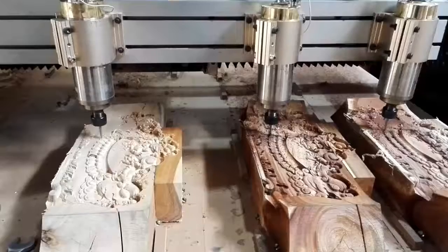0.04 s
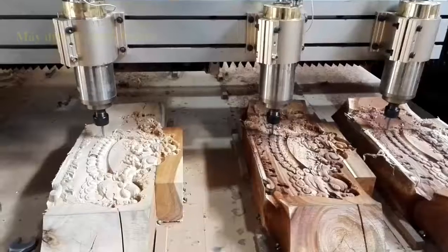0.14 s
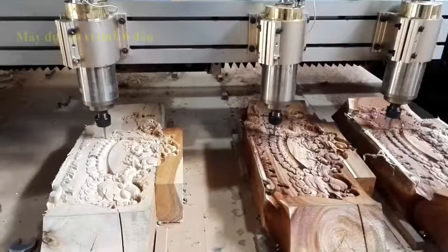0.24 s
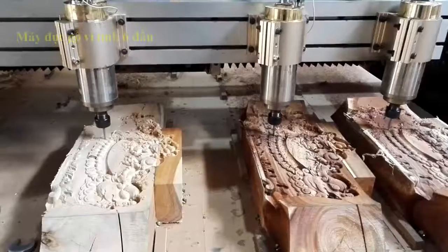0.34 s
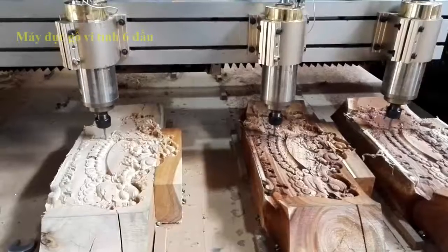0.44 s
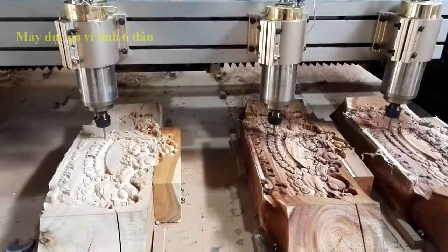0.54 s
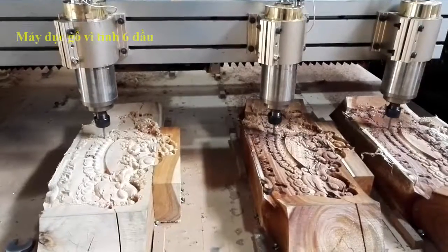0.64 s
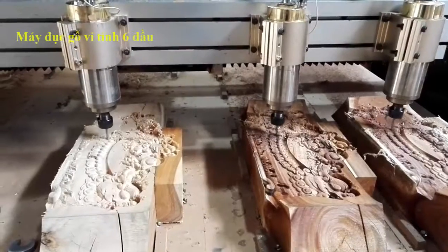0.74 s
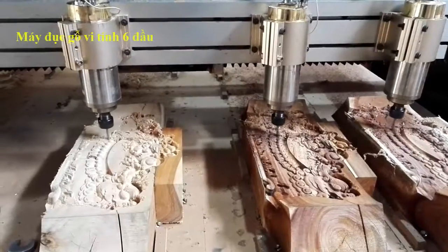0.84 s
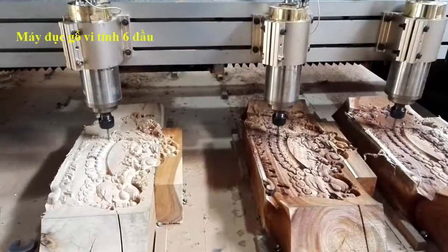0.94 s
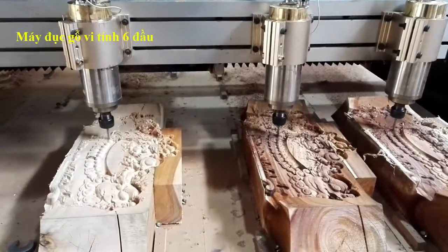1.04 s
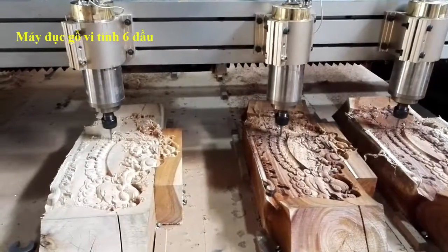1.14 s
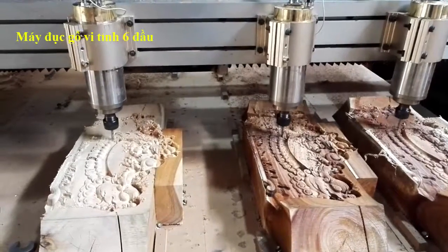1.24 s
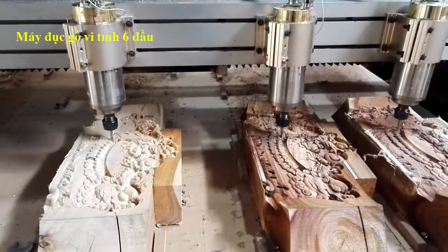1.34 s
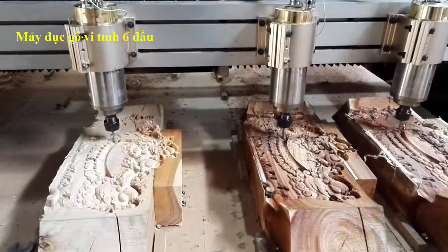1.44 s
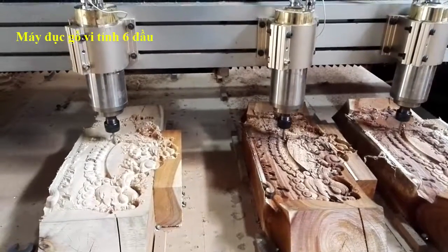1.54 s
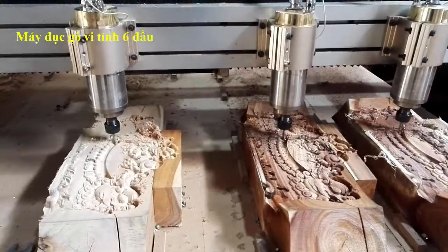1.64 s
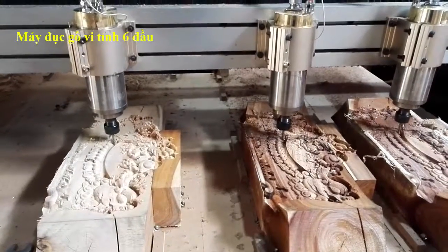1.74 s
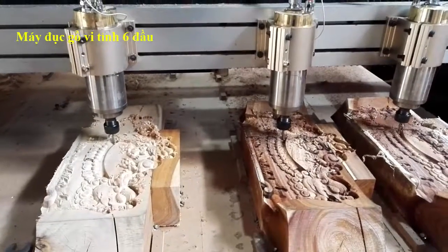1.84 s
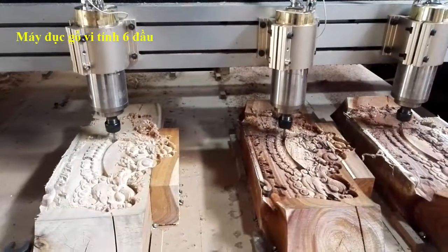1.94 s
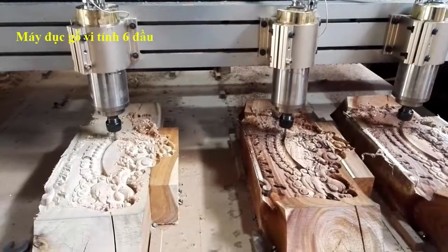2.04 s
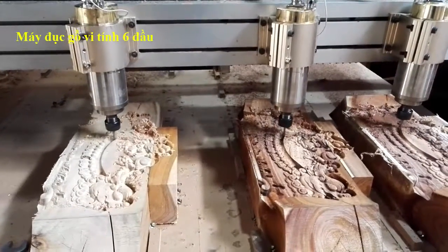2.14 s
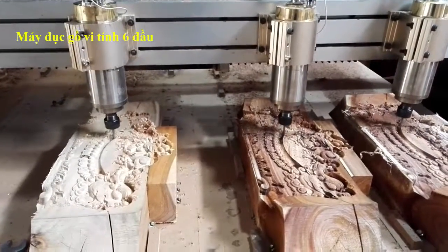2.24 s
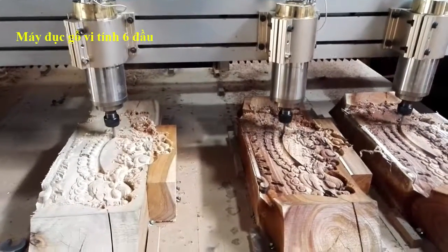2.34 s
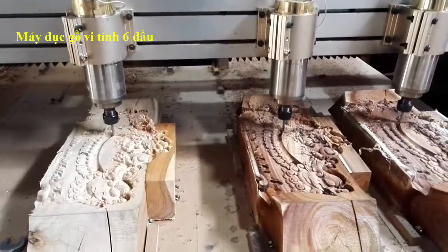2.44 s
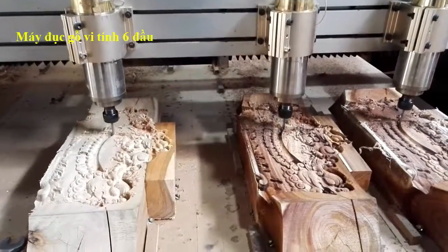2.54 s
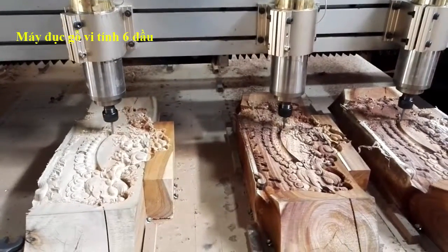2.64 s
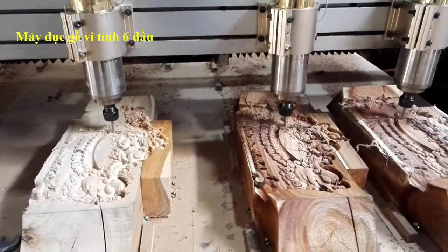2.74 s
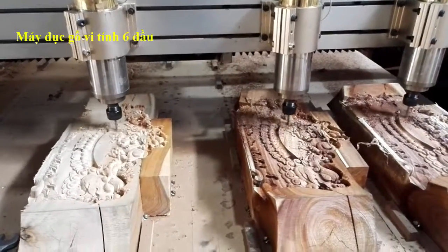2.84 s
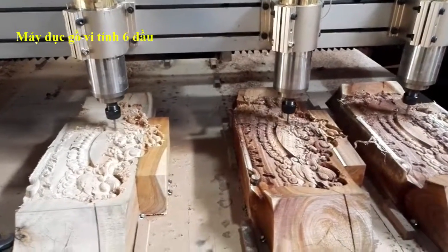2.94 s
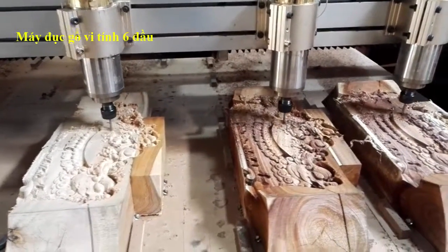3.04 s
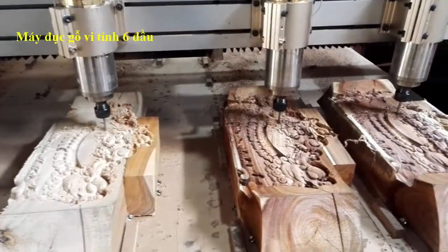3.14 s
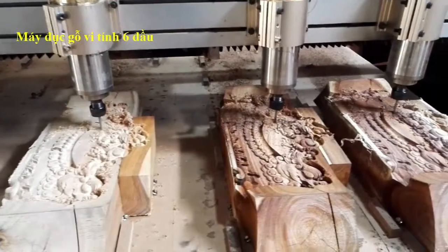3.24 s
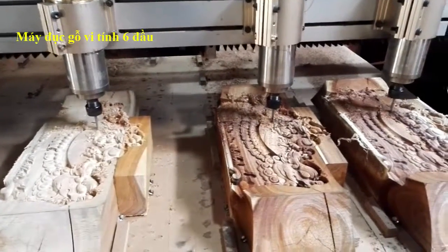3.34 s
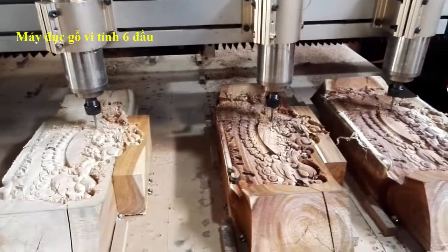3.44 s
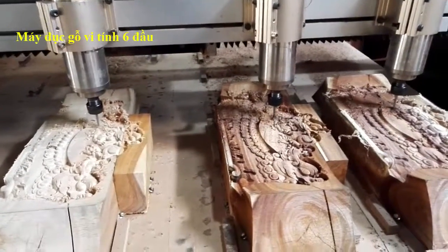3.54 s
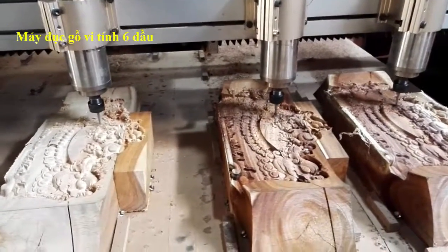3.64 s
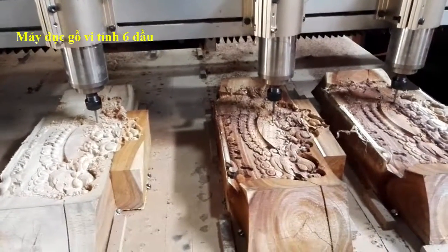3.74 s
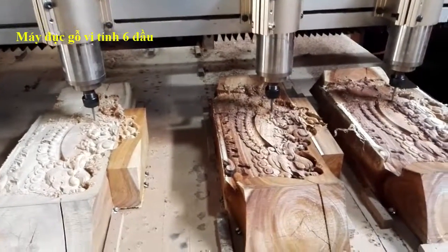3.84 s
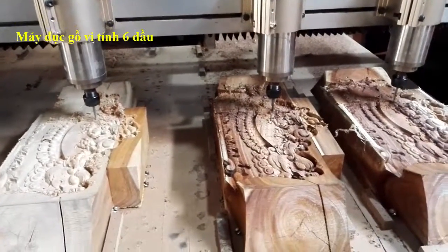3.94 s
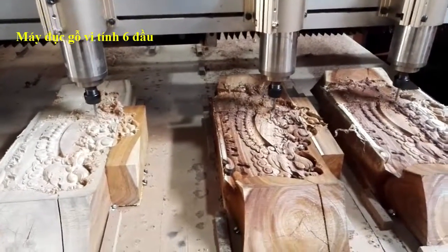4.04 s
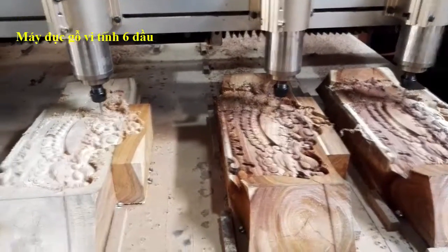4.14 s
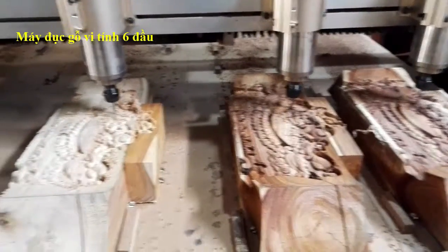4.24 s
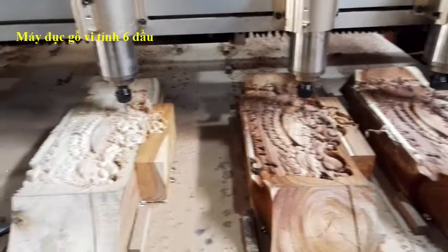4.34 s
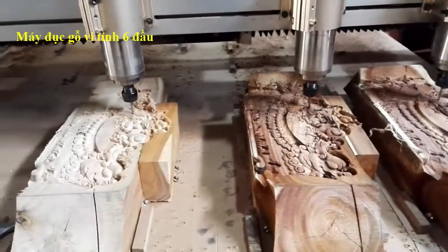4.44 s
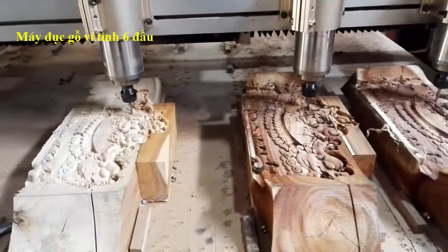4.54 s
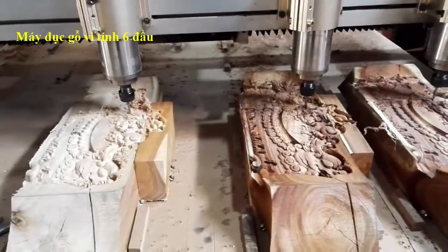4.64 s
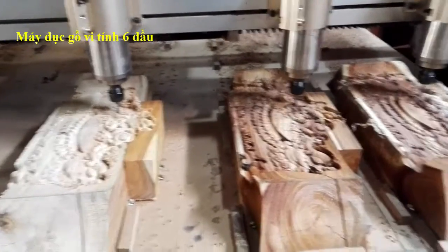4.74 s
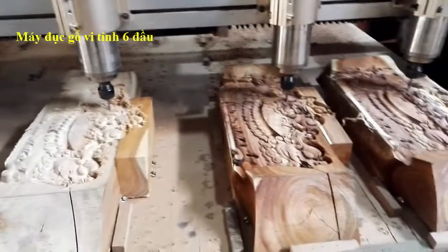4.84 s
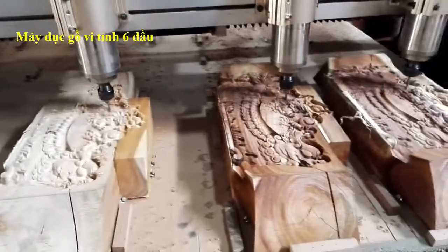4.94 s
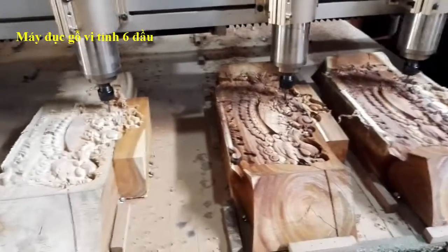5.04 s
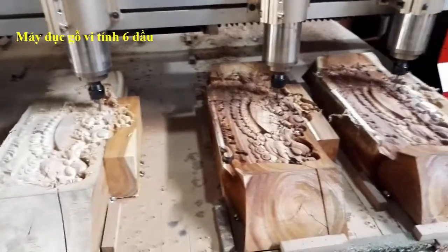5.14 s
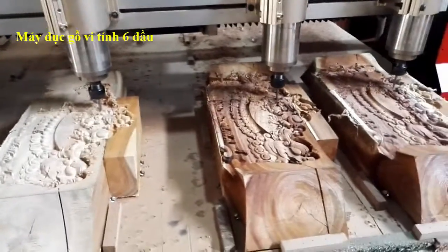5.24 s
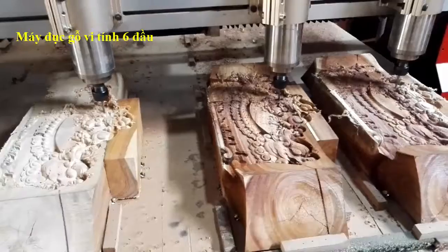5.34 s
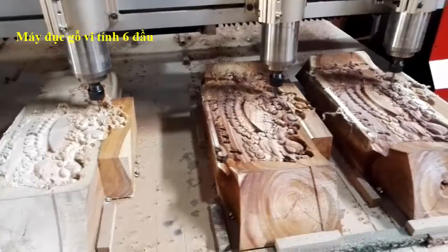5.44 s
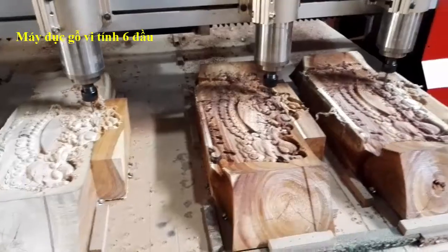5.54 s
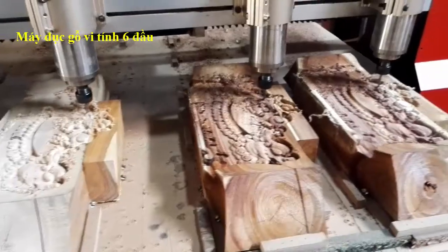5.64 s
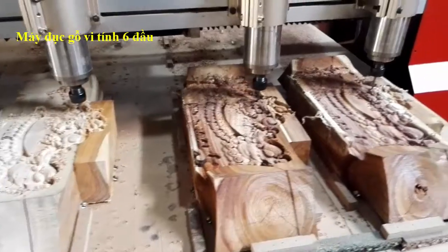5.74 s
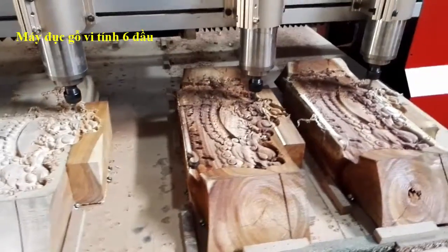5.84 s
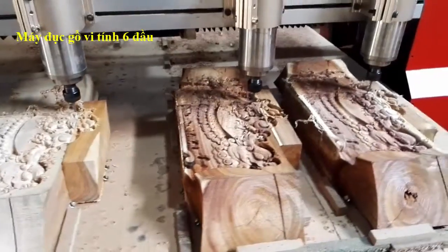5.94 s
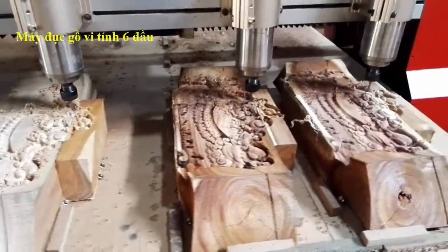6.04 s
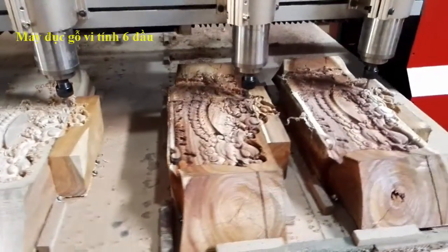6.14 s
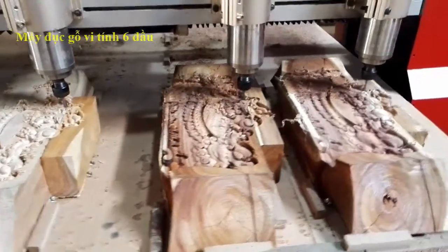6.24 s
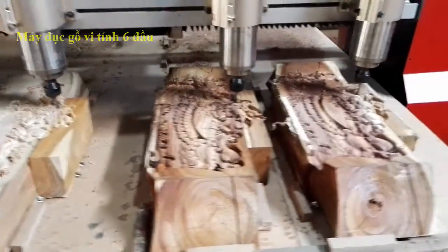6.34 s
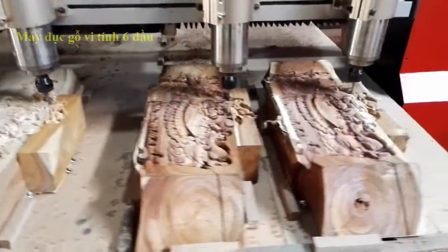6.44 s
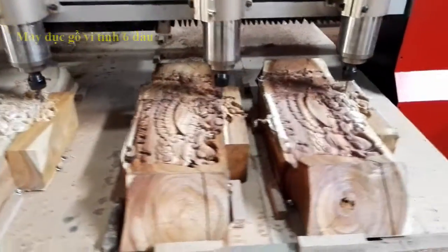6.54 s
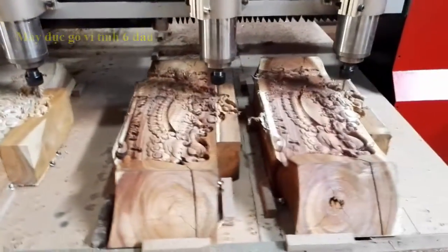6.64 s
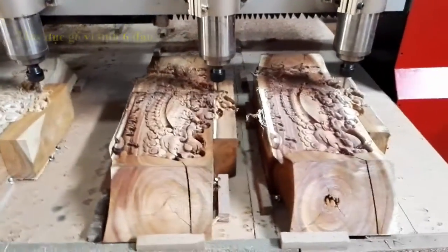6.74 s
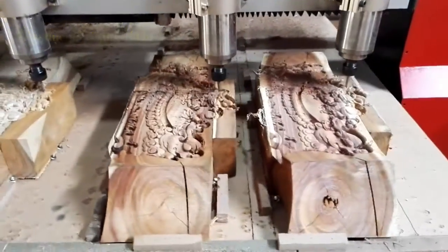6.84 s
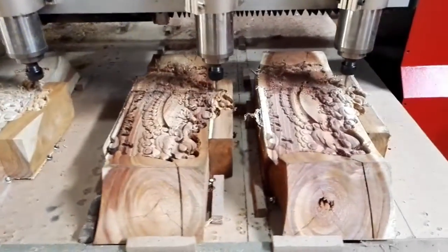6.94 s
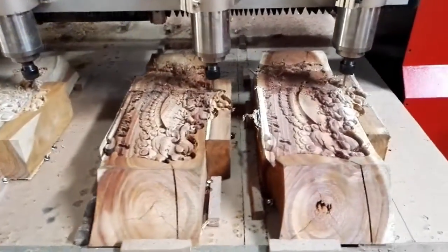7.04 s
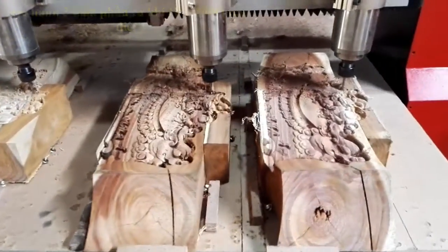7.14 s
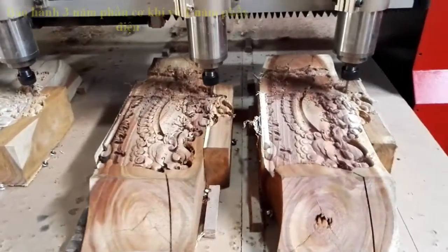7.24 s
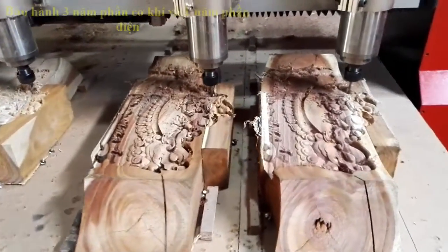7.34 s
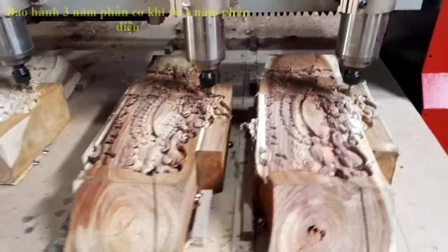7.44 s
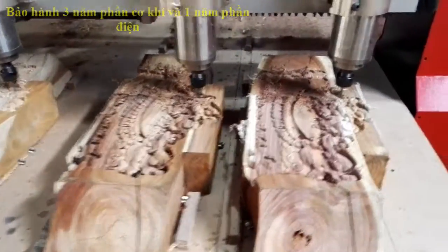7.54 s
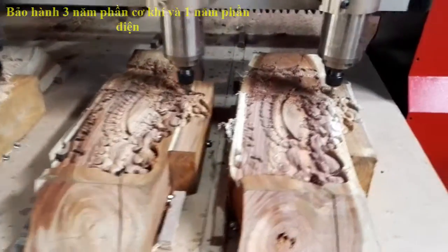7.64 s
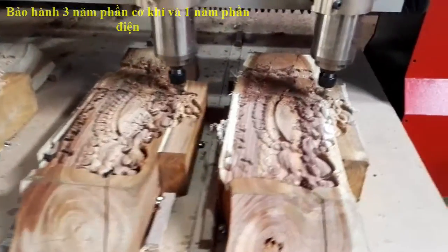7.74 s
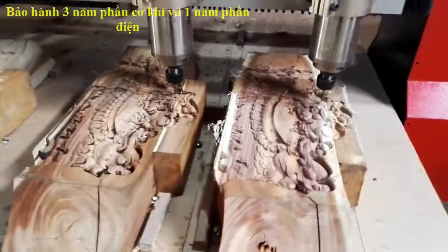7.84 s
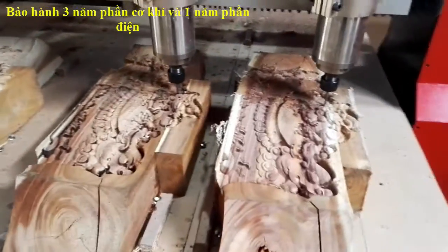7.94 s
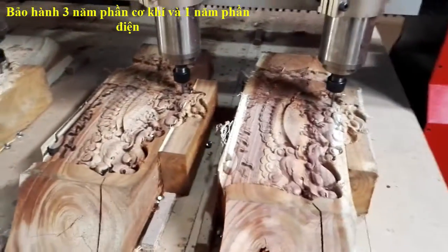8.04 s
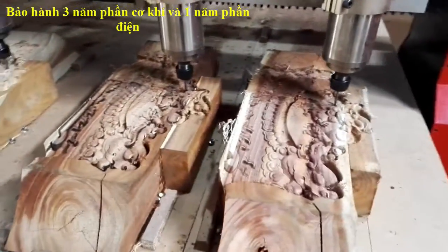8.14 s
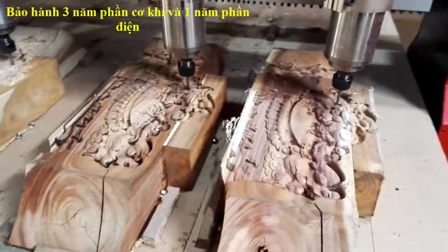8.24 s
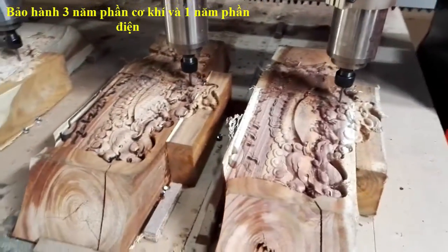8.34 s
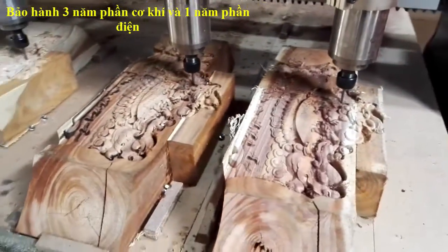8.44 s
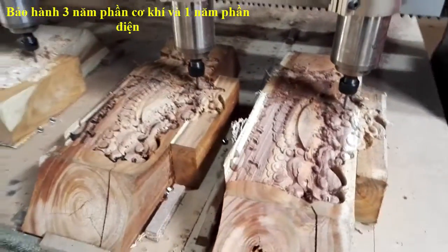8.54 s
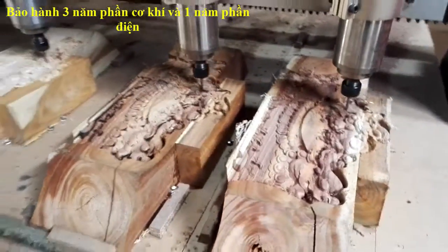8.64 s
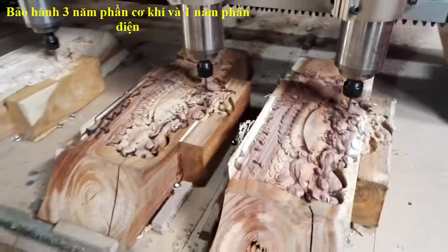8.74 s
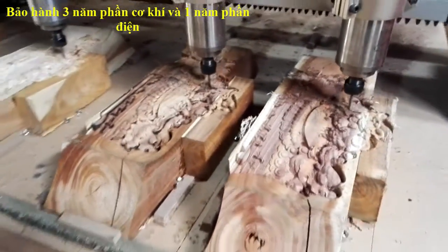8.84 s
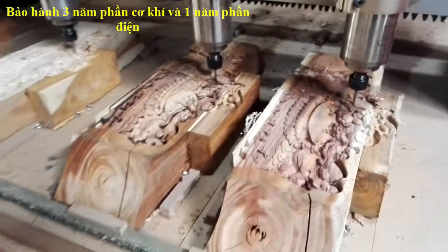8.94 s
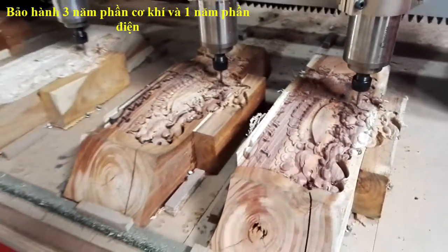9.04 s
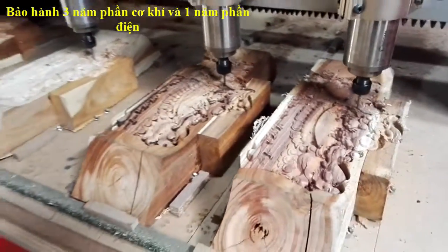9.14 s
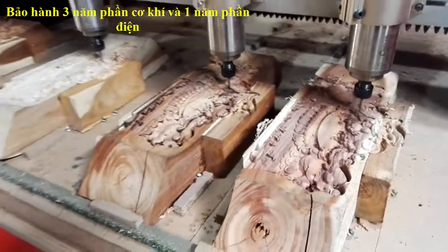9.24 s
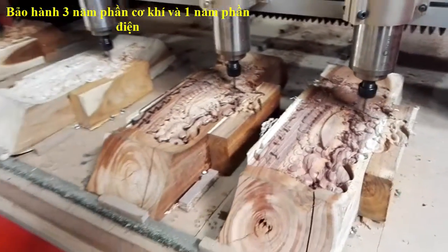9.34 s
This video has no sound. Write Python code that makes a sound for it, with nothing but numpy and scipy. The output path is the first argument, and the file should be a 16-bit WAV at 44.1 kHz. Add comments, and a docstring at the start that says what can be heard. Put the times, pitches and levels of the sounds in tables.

```python
"""A steady whine fades in: a row of router spindles is carving hardwood in a workshop.
Each turn repeats the cut, so the whine is a stack of harmonics (multiples of the turning rate) that
swell and fade as the spindles, at nearly the same speed, slip against each other. Behind it chips
hiss, the drive whistles, and pumps and the frame rumble. The level jumps briefly near 2.5 s.
Later the sound cuts forward once with a soft click, like a brief dropout."""
import sys
import numpy as np
from scipy import signal
from scipy.io import wavfile
from scipy.ndimage import uniform_filter1d

SR = 44100
rng = np.random.default_rng(int(sys.argv[2]) if len(sys.argv) > 2 else 0)


def bounce(signal):
    """Save signal as a 16-bit WAV file at the path given by the first command-line argument."""
    frames = np.transpose(np.atleast_2d(signal))
    limited = np.clip(frames, -1, 1)
    pcm = np.round(limited * 32767).astype(np.int16)
    wavfile.write(sys.argv[1], SR, pcm)


N = 413658
TIME = np.arange(N) / SR
STEP = 64   # samples between the points of a slow random curve
OPPOSITE = np.array([[1], [-1]])   # adds on the left, subtracts on the right
SHAFT_HZ = 399.46   # spindle turns per second
DROPOUT_S, DROPOUT_RAD = 5.3602, 1.7   # when the sound cuts forward, and by what phase


def from_db(db):
    """Turn decibels into a gain."""
    return 10 ** (np.asarray(db) / 20)


def rms_one(x):
    """Scale a signal to an average power of 1."""
    return x / np.sqrt(np.mean(np.abs(x) ** 2) + 1e-20)


def in_time(rows):
    """Join (time, value) rows into one value per sample."""
    return np.interp(TIME, *np.transpose(rows))


def at_hz(rows, hz):
    """Read (frequency, value) rows at one frequency, with octaves evenly spaced."""
    frequencies, values = np.transpose(rows)
    return np.interp(np.log(hz), np.log(frequencies), values)


def drift(rate_hz):
    """A smooth random curve of typical size 1; a higher rate moves faster."""
    pole = np.exp(-2 * np.pi * rate_hz * STEP / SR)
    noise = rng.standard_normal(N // STEP + 2002)
    points = rms_one(signal.lfilter([1], [1, -2 * pole, pole * pole], noise)[2000:])
    return np.interp(np.arange(N) / STEP, np.arange(len(points)), points)


def beating(rate_hz):
    """Many near-equal tones together: strength and phase drift at random (a complex curve)."""
    return (drift(rate_hz) + 1j * drift(rate_hz)) / np.sqrt(2)


# How alike the noise is on the left and right: (frequency [Hz], likeness [0 to 1])
STEREO_LIKENESS = [(60, .96), (150, .94), (300, .85), (640, .55), (1400, .3), (4000, .35), (14900, .35)]
def banded_noise(spectrum, low_hz, count, flicker_db, balance=((1, 0), (2, 0))):
    """Stereo noise of power 1, built from flickering bands a third of an octave wide."""
    out, shared_flicker = 0, drift(9.5)
    edges = low_hz * 2 ** (np.arange(count + 1) / 3)
    white = rng.standard_normal((2, 2, N))
    for k, (low, high) in enumerate(zip(edges, edges[1:])):
        band = signal.butter(2, [low, high], "band", fs=SR, output="sos")
        middle, side = signal.sosfilt(band, white[k % 2])
        hz = np.sqrt(low * high)
        alike = at_hz(STEREO_LIKENESS, hz)
        stereo = np.sqrt(1 + alike) * middle + np.sqrt(1 - alike) * side * OPPOSITE
        flicker = 1.87 * shared_flicker + drift(5.1)
        gain = from_db(at_hz(spectrum, hz) + flicker_db * flicker)
        pan = from_db(at_hz(balance, hz) / 2 * OPPOSITE)
        out = out + gain * pan * stereo
    return rms_one(out)


# Tone colour of the rumble: (frequency [Hz], relative level [dB])
RUMBLE_SPECTRUM = [(25, -14), (50, 1.5), (85, 7.5), (120, 8), (170, 2.5), (220, -26), (280, 17.5),
                   (330, -4.5), (420, 13), (520, -11.5), (700, 14), (900, -2), (1200, 7), (1800, -41)]
def rumble():
    """The pumps and the shaking frame make a low noise."""
    return from_db(-36) * banded_noise(RUMBLE_SPECTRUM, low_hz=22.7, count=19, flicker_db=.8)


# Faint steady tones of pumps and drives: (frequency [Hz], relative level [dB])
DRIVE_TONES = [(113, -56), (269.2, -54), (279, -57), (578, -58), (2472, -59), (4597, -61), (5399, -53),
               (8699, -57), (10191, -56), (10648, -58), (11391, -57)]
# A thin, high whistle: (time [s], relative level [dB])
THIN_WHISTLE = [(.1, -48), (.4, -42), (.55, -60), (.75, -39), (1.15, -56), (1.4, -40), (1.6, -43),
                (1.8, -48), (2.05, -45), (2.45, -48), (2.9, -70), (3.4, -51), (4.15, -39), (4.3, -40),
                (4.7, -41), (6.2, -44), (6.6, -37), (7.6, -38), (7.9, -38), (8.5, -36), (8.7, -39),
                (9.38, -50)]
# A breathy whistle that grows and chatters near the end: (time [s], relative level [dB])
BREATHY_WHISTLE = [(7.9, -50), (7.96, -55), (8.104, -43), (8.202, -48), (8.226, -37), (8.286, -52),
                   (8.408, -41), (8.432, -49), (8.642, -39), (8.682, -40), (8.756, -34), (8.788, -43),
                   (8.962, -37), (8.974, -45), (9.212, -37), (9.232, -49), (9.336, -40), (9.35, -40)]
def drive():
    """Pumps and drives hum and whistle in wavering tones, louder on the left."""
    out = np.zeros((2, N))
    tones = [(hz, db, 5, .9) for hz, db in DRIVE_TONES]
    tones += [(12592, in_time(THIN_WHISTLE), 5, .4), (11240, in_time(BREATHY_WHISTLE), 60, 2)]
    for hz, db, waver_hz, waver in tones:
        tone = from_db(db) * np.exp(2j * np.pi * hz * TIME) * (1 + waver * beating(waver_hz))
        out[0] += 1.8 * np.real(tone)
        out[1] += 1.1 * np.real(tone * np.exp(1j * hz / 2900))   # high tones arrive out of step
    return out


# Tone colour of the hiss: (frequency [Hz], relative level [dB])
CHIP_SPECTRUM = [(900, -4.5), (1300, -4.5), (2000, -1), (3300, -6), (5000, -4), (7000, -2), (8300, -3.5),
                 (10500, 5), (12500, -5.5), (15000, -1.5)]
# Which side the hiss leans to: (frequency [Hz], left minus right [dB])
CHIP_BALANCE = [(60, 0.0), (150, 0.0), (380, 0.5), (950, 3), (2370, 1.5), (5950, -2.5), (14900, 2)]
def chips(angle, hiss_db):
    """Torn fibres and air from the cutting edges hiss, pulsing once a turn."""
    pulse = 1 + .1 * np.cos(angle)
    hiss = banded_noise(CHIP_SPECTRUM, low_hz=797.5, count=13, flicker_db=.6, balance=CHIP_BALANCE)
    # The tearing repeats on the next three turns, duller and half as strong each time.
    dull = signal.sosfilt(signal.butter(2, 7000, fs=SR, output="sos"), hiss)
    repeats = sum(.5 ** turn * np.roll(dull, round(turn * SR / SHAFT_HZ), axis=1) for turn in (1, 2, 3))
    left, right = from_db(hiss_db) * pulse * (hiss + repeats)
    # From about 2 s, the hiss reaches the right side slightly later than the left.
    lag_samples = np.round(np.interp(TIME, (1.5, 2.2), (0, 16))).astype(int)
    return np.array([left, right[np.arange(N) - lag_samples]])


def dropout_click():
    """A soft, dull click where the sound cuts forward, like a brief dropout."""
    peak_db, dullness_hz = -17, 1800
    decay = 2 * np.pi * dullness_hz * np.maximum(TIME - DROPOUT_S, 0)
    return from_db(peak_db) * np.e * decay * np.exp(-decay)


RISE_S, FALL_S = .023, .019   # how fast a deep cut or a ringing harmonic comes and goes
# Deeper cuts: (start [s], end [s], bite change [dB], squeal change [dB], hiss change [dB])
DEEP_CUTS = [(0.47, 0.612, 1, 1, 0), (1.214, 1.477, 2, 3, -0.5), (1.528, 1.8, 2.5, 3, 1),
             (1.77, 1.889, 3.5, 3, 3.5), (1.892, 1.955, -2, 17, 4.5), (2.038, 2.12, 5, 6, 5),
             (2.12, 2.438, 1.5, 3.5, 1), (2.816, 3.05, 6, 8, 3), (3.118, 3.205, 5, 3, -1),
             (3.537, 3.718, 3.5, 11, 1), (3.737, 3.81, 2.5, 7, -0.5), (4.012, 4.1, -0.5, 6, 2),
             (4.292, 4.413, 0, 9.5, 1), (4.43, 4.54, 4.5, 12, 3.5), (4.72, 4.797, 6.5, 10, 1.5),
             (4.824, 4.945, 5, 9, 3.5), (5.046, 5.125, 5.5, 6, -1), (5.263, 5.436, 5, 3, 0.5),
             (5.586, 5.73, 4.5, 0, 1), (6.086, 6.21, 3, 6, 2.5), (6.606, 6.768, 6, 6.5, 0),
             (6.77, 6.877, 5, 4, 3.5), (7.624, 7.8, 2, 1, 2), (8.306, 8.702, 1, 2, 1.5),
             (8.71, 8.77, 3, 11, 2), (8.987, 9.24, 3, 5, 2)]
def cut_levels():
    """Levels in dB of the bite, squeal and hiss, which follow how deep the cutters dig."""
    starts, ends, *columns = np.transpose(DEEP_CUTS)
    wander_db = .6 * drift(7.4)
    levels = []
    for usual_db, changes in zip((-40, -47, -31.5), columns):
        extra_db = np.zeros(N)
        for start, end, db in zip(starts, ends, changes):
            extra_db += db * (TIME > start) * np.exp(-np.maximum(TIME - end, 0) / FALL_S)
        levels.append(usual_db + uniform_filter1d(extra_db, size=int(RISE_S * SR)) + wander_db)
    return levels


# The bite, harmonics 7 to 21: (harmonic [number], level against the bite level [dB])
BITE_HARMONICS = [(7, -6.5), (8, -8.5), (9, -6), (10, -4), (11, -5), (12, -5), (13, -6), (14, -6.5),
                  (15, -9), (16, -4.5), (17, -6.5), (18, -6.5), (19, -10.5), (20, -35), (21, -39)]
# The squeal, harmonics 22 to 35: (frequency [Hz], level against the squeal level [dB])
SQUEAL_SPECTRUM = [(8500, -12), (9200, -1.5), (10400, 0), (11600, -10), (12800, -7), (14200, -12)]
def high_whine(angle, bite_db, squeal_db):
    """Weak harmonics come and go on each side as the spindles slip; uneven wood roughens them."""
    out = np.zeros((2, N))
    levels = [(harmonic, bite_db + db) for harmonic, db in BITE_HARMONICS]
    for harmonic in range(22, 36):
        levels.append((harmonic, squeal_db + at_hz(SQUEAL_SPECTRUM, harmonic * SHAFT_HZ)))
    for harmonic, db in levels:
        shared_fade = beating(3.9)
        swell_db = .98 * drift(3.2)
        tone = from_db(db + swell_db) * np.exp(1j * harmonic * angle)
        for channel in range(2):
            own_fade, roughness = beating(7.4), beating(35.4)
            out[channel] += np.real(tone * (.22 * shared_fade + own_fade + .78 * roughness))
    return out


# Harmonics that ring out; a row that ends before it starts is faint or silent:
# (harmonic [number], start [s], end [s], relative level [dB])
RINGING_HARMONICS = [(7, 0.44, 0.58, -45), (13, 0.48, 0.69, -46), (7, 1.77, 2.04, -43), (13, 1.8, 1.9, -46),
                     (16, 1.7, 1.7, -45), (15, 2.2, 2.2, -46), (13, 2.05, 2, -38), (12, 2.05, 2.33, -46),
                     (10, 2.05, 2.15, -52), (7, 2.2, 2, -43), (11, 2.2, 2.3, -43), (9, 2.6, 2.9, -44),
                     (11, 2.9, 3.27, -40), (13, 2.8, 3.1, -38.5), (15, 2.85, 3.03, -41),
                     (10, 3.1, 3.2, -44), (12, 3.2, 3.0, -44), (11, 2.9, 3.5, -53), (11, 2.9, 4.1, -50),
                     (7, 4.05, 4.4, -42), (9, 4.6, 4.7, -42), (16, 4.4, 4.2, -49), (13, 4.5, 4.6, -47),
                     (7, 5.4, 5.5, -38), (11, 5.1, 5.7, -45), (13, 6.1, 5.8, -44), (13, 6.1, 6.26, -38.5),
                     (12, 6.1, 6.18, -38.5), (11, 6.1, 6.4, -48), (9, 7.2, 6.78, -42), (11, 6.9, 6.85, -43),
                     (12, 6.62, 6.78, -48), (10, 6.72, 6.82, -38.5), (14, 6.7, 6.95, -41),
                     (15, 7.6, 6.9, -51), (9, 7.5, 6.7, -40), (7, 7.2, 7.5, -41.5), (16, 8.0, 8.302, -44)]
def ringing(angle):
    """Single high harmonics ring out clearly while a cutter bites."""
    out = np.zeros((2, N))
    for harmonic, start, end, db in RINGING_HARMONICS:
        span = slice(int((start - .05) * SR), int((end + .2) * SR))
        rise = np.clip((TIME[span] - start) / RISE_S + .5, 0, 1)
        fall = np.exp(-np.maximum(TIME[span] - end, 0) / FALL_S)
        roughness = np.abs(1 + .35 * beating(30)[span])
        phases = rng.uniform(0, 2 * np.pi) + rng.uniform(-1.15, 1) * OPPOSITE
        tone = np.cos(harmonic * angle[span] + phases)
        out[:, span] += 2 * from_db(db) * rise * fall * roughness * tone
    return out


# Harmonics 3 to 6 of the whine, one table each: (time [s], level [dB])
THIRD_LEVEL = [(0.2, -31), (0.43, -40), (0.5, -33), (0.96, -31.5), (1.04, -48), (1.17, -31.5), (1.75, -32),
               (1.85, -24.5), (2.03, -44), (2.08, -30), (2.24, -45), (2.44, -46), (2.49, -35), (2.64, -41),
               (2.77, -34.5), (3.0, -32), (3.1, -43), (3.15, -34), (3.28, -32), (3.33, -43.5),
               (3.61, -32.5), (3.87, -53), (4.33, -32.5), (4.58, -45), (4.63, -38), (4.91, -35.5),
               (5.27, -44), (5.32, -33), (5.47, -37), (5.65, -33), (5.83, -52), (5.98, -31), (6.14, -43.5),
               (6.37, -42), (6.42, -30), (6.57, -58), (6.62, -37), (6.8, -30), (6.98, -39.5), (7.18, -35.5),
               (7.26, -50), (7.31, -34), (7.41, -34), (7.51, -48), (7.56, -34.5), (7.87, -33), (7.94, -48),
               (8.25, -36.5), (8.46, -42), (8.76, -31.5), (9.32, -41), (9.35, -40)]
FOURTH_LEVEL = [(0.2, -40), (0.3, -35.5), (0.43, -42), (0.5, -32), (0.61, -44), (0.66, -40.5), (1.35, -35),
                (1.47, -39), (1.52, -62), (1.58, -39), (1.65, -36), (1.78, -46), (1.83, -36), (2.14, -31.5),
                (2.21, -47), (2.49, -35), (2.57, -48), (2.95, -28.5), (3.03, -37), (3.2, -37), (3.28, -51),
                (3.38, -36), (3.51, -52), (3.56, -39), (3.67, -59), (3.72, -46.5), (4.58, -40.5),
                (4.91, -49), (4.99, -33), (5.07, -49), (5.55, -38.5), (5.73, -47), (5.96, -40), (6.01, -61),
                (6.06, -39), (6.16, -34), (6.34, -47), (7.11, -37.5), (7.33, -52), (7.51, -35), (7.85, -52),
                (7.92, -39.5), (8.35, -45), (8.41, -38), (8.51, -48), (8.74, -35), (8.86, -49), (9.35, -43)]
FIFTH_LEVEL = [(0.2, -44), (0.35, -39), (0.4, -51), (0.5, -32), (0.56, -52), (0.79, -38.5), (0.86, -47),
               (0.89, -34), (1.06, -45), (1.22, -39), (1.32, -52), (1.42, -42), (1.5, -46), (1.75, -39),
               (1.78, -47), (1.96, -51), (2.11, -37), (2.26, -52), (2.49, -40), (2.54, -53), (2.88, -35),
               (3.64, -55), (3.76, -42.5), (4.79, -50), (4.94, -39), (5.04, -50), (5.14, -44), (6.06, -51),
               (6.11, -38), (6.54, -46.5), (6.57, -35), (6.75, -31), (6.82, -44), (6.98, -33), (7.23, -51),
               (7.46, -35.5), (7.67, -45), (8.23, -38), (8.33, -48), (8.41, -41), (8.56, -50), (8.66, -35),
               (8.76, -38), (9.35, -40)]
SIXTH_LEVEL = [(0.2, -40), (0.32, -39), (0.35, -43), (0.86, -50), (0.89, -40), (0.99, -40), (1.01, -45),
               (1.29, -44), (1.35, -32), (1.45, -43), (1.52, -38), (1.7, -52), (1.78, -30), (2.01, -52),
               (2.08, -30.5), (2.44, -35), (2.49, -38), (2.54, -38), (2.64, -45), (2.85, -22), (2.9, -30),
               (3.05, -27), (3.15, -46), (3.44, -44.5), (3.69, -35.5), (3.74, -49), (4.0, -51),
               (4.05, -34.5), (4.23, -57), (4.35, -40), (4.41, -49), (4.53, -36), (4.63, -49), (4.81, -39),
               (4.84, -32.5), (5.14, -33), (5.19, -56), (5.29, -35.5), (5.4, -40), (5.68, -36.5),
               (5.88, -43), (5.93, -34.5), (6.09, -42.5), (6.14, -34), (6.39, -54), (6.75, -28.5),
               (7.0, -35), (7.11, -32.5), (7.23, -46.5), (7.46, -30), (7.51, -42), (7.85, -43.5),
               (7.94, -30.5), (8.1, -37), (8.76, -30), (8.84, -33.5), (8.91, -54), (8.97, -34), (9.04, -50),
               (9.35, -51)]
def middle_levels():
    """Levels in dB of harmonics 3 to 6, with small random fades added."""
    levels, depth = [], .15
    for rows in (THIRD_LEVEL, FOURTH_LEVEL, FIFTH_LEVEL, SIXTH_LEVEL):
        fade = np.abs(1 + depth * beating(3.5)) / np.hypot(1, depth) + .042
        levels.append(in_time(rows) + 20 * np.log10(fade))
    return levels


# Two sets of cutting edges slip out of step and back:
# (out of step [s], in step [s], level in step [dB], weaker set [share of the stronger])
EDGE_SLIPS = [(0.0, 0.187, -23, .3), (0.334, 0.485, -25.5, 0.48), (0.587, 0.733, -24, 0.43),
              (0.877, 1.135, -23.5, 0.44), (1.302, 1.59, -24, 0.33), (1.772, 1.824, -28, 0.38),
              (1.9, 2.02, -29, 0.26), (2.077, 2.118, -18, 0.44), (2.185, 2.308, -24.5, 0.99),
              (2.36, 2.47, -21.5, 0.061), (2.6, 2.652, -22.5, 0.14), (2.815, 2.86, -17.5, 0.43),
              (2.9, 2.96, -17, .1), (3.134, 3.294, -22.5, 0.81), (3.515, 3.595, -21, 1),
              (3.826, 4.02, -29.5, 1), (4.145, 4.184, -28.5, 0.29), (4.252, 4.36, -26, 0.54),
              (4.54, 4.608, -28, 0.31), (4.736, 4.878, -20.5, 0.73), (4.948, 5.022, -21, 0.064),
              (5.164, 5.337, -23.5, 0.76), (5.495, 5.643, -20, 0.54), (5.704, 5.751, -20.5, 0.15),
              (5.915, 5.99, -29, 0.3), (6.073, 6.14, -19.5, 0.64), (6.217, 6.29, -23, 0.05),
              (6.58, 6.668, -22, .55), (6.71, 6.79, -20.5, 0.14), (6.853, 6.876, -20, .5),
              (6.89, 6.9, -24, 0.82), (7.12, 7.25, -29.5, 0.93), (7.3, 7.565, -18, 0.11),
              (7.68, 7.713, -25, 0.53), (7.76, 7.84, -27, 1), (8.089, 8.196, -24.5, 0.3),
              (8.403, 8.504, -20, 0.48), (8.585, 8.722, -17, 0.41), (8.94, 9.112, -18.5, 0.81),
              (9.345, 9.5, -24, 0.82)]
def slipping_edges_level():
    """Level in dB of harmonic 2: two sets of edges add up in step and partly cancel out of step."""
    apart, together, db, share = np.transpose(EDGE_SLIPS)
    moments = np.column_stack([apart, together]).ravel()
    slip = np.interp(TIME, moments, np.pi * np.arange(len(moments)))
    weaker = np.interp(TIME, apart, np.clip(share, 0, .95))
    combined = np.abs(1 - weaker * np.exp(1j * slip)) / (1 + weaker)
    return np.interp(TIME, together, db) + 20 * np.log10(combined)


# The lowest note of the whine, at the turning rate: (time [s], level [dB])
SHAFT_LEVEL = [(.1, -19), (.75, -18), (1.1, -20), (1.6, -19), (2.0, -23), (2.3, -28.5), (2.57, -22),
               (2.9, -26), (3.25, -26.5), (3.4, -22.5), (3.65, -34.5), (3.95, -29), (4.2, -33), (4.27, -53),
               (4.35, -35), (4.43, -37), (4.57, -28), (4.9, -32.5), (5.2, -24), (5.5, -27.5), (6.05, -26),
               (6.5, -26.5), (6.6, -31.5), (6.8, -25), (7.12, -38.5), (7.25, -27), (7.45, -37), (7.55, -28),
               (7.68, -33), (7.9, -25.5), (8.08, -31), (8.25, -27.5), (8.4, -30.5), (8.52, -24.5),
               (8.9, -25), (9.25, -24.5), (9.38, -28)]
def shaft_level():
    """Level in dB of harmonic 1; it flutters briefly, as if beating against a slightly faster spindle."""
    start_s, end_s, depth, flutter_hz = 1.45, 1.8, .27, 24.3
    fluttering = (TIME > start_s) & (TIME < end_s)
    flutter = 1 + depth * fluttering * np.sin(2 * np.pi * flutter_hz * (TIME - start_s))
    return in_time(SHAFT_LEVEL) + 20 * np.log10(flutter)


def shaft_angle():
    """Shaft angle in radians as it is heard: the speed wavers, and the dropout cuts forward once."""
    speed_hz = SHAFT_HZ + .303 * drift(2.43)
    return 2 * np.pi * np.cumsum(speed_hz) / SR + DROPOUT_RAD * (TIME > DROPOUT_S)


# How much uneven wood roughens harmonics 1 to 6, one value each: (roughness [share of the tone])
WOOD_GRAIN = [.13, .22, .3, .35, .4, .3]
# Sound of the spindles off to the sides: (frequency [Hz], level against the centre [dB])
SIDE_SPECTRUM = [(400, -17.5), (800, -4), (1200, 3.5), (1600, 4), (2000, 1.5), (2400, -3)]
# The whine reaches the left side first: (time [s], part a quarter cycle ahead [share of the tone])
LEFT_LEAD = [(0, .2), (1.2, .05), (2.6, 0), (3.4, .35), (5, .35), (5.8, .1), (7.2, .45), (8.1, .6),
             (8.9, .05), (9.4, 0)]
def low_whine(angle):
    """The six strong harmonics of the cut; spindles off centre make left and right differ."""
    out, lead = np.zeros((2, N)), in_time(LEFT_LEAD)
    middle = middle_levels()
    lowest = [db + .9 * drift(8) for db in (shaft_level(), slipping_edges_level())]   # a slight wobble
    for harmonic, level_db in enumerate(lowest + middle, 1):
        tone = np.exp(1j * harmonic * (angle + .28 * drift(3.1)))
        centre = from_db(level_db) * (1 + WOOD_GRAIN[harmonic - 1] * beating(22.7))
        average_db = uniform_filter1d(level_db, size=SR // 3)
        side = from_db(average_db + at_hz(SIDE_SPECTRUM, harmonic * SHAFT_HZ)) * beating(2.4)
        side += 1j * lead * from_db(average_db) / harmonic
        out += np.sqrt(2) * np.real(tone * (centre + side * OPPOSITE))
    return out


def scene():
    """Add up the rumble, drive, chips, click and whine."""
    bite_db, squeal_db, hiss_db = cut_levels()
    angle = shaft_angle()
    background = rumble()
    whine = low_whine(angle) + high_whine(angle, bite_db, squeal_db) + ringing(angle)
    return background + drive() + chips(angle, hiss_db) + dropout_click() + whine


def record(dry):
    """The sound fades in, jumps in level once, then stays lower; its highest treble is softened."""
    silence_s, fade_s = .054, .27
    jump_start_s, jump_end_s, jump_db = 2.4755, 2.4966, 8.3
    early_db, sag_db, drop_s, recover_s = 3.5, -2, .025, .52
    split_hz, top_db, cutoff_hz = 14250, -11, 15500
    fade_in = np.clip((TIME - silence_s) / fade_s, 0, 1)
    jump = uniform_filter1d(1. * ((TIME > jump_start_s) & (TIME < jump_end_s)), size=60)
    # After the jump the level drops quickly, sags a little too far and recovers.
    since = np.maximum(TIME - jump_end_s, 0)
    base_db = (early_db - sag_db) * np.exp(-since / drop_s) + sag_db * np.exp(-since / recover_s)
    sound = np.clip(dry * fade_in * from_db(base_db + jump_db * jump), -1, 1)
    body = signal.sosfilt(signal.ellip(7, .3, 40, split_hz, fs=SR, output="sos"), sound)
    top = signal.sosfilt(signal.ellip(7, .3, 40, split_hz, "high", fs=SR, output="sos"), sound)
    treble_cut = signal.ellip(10, .3, 70, cutoff_hz, fs=SR, output="sos")
    return signal.sosfilt(treble_cut, body + from_db(top_db) * top)


dry = scene()
out = record(dry)
bounce(out)
```